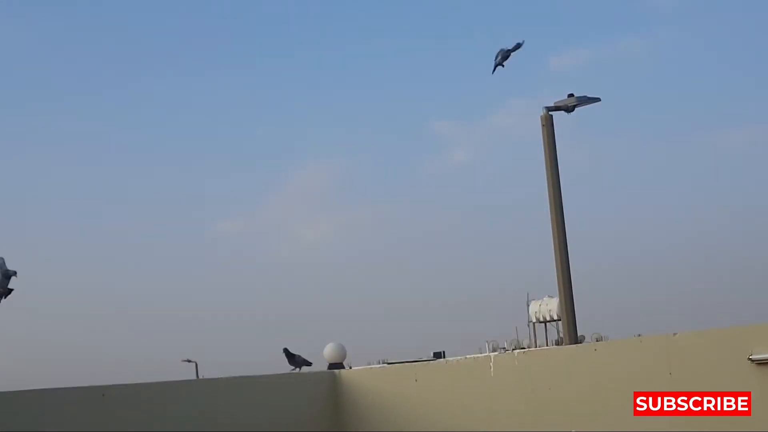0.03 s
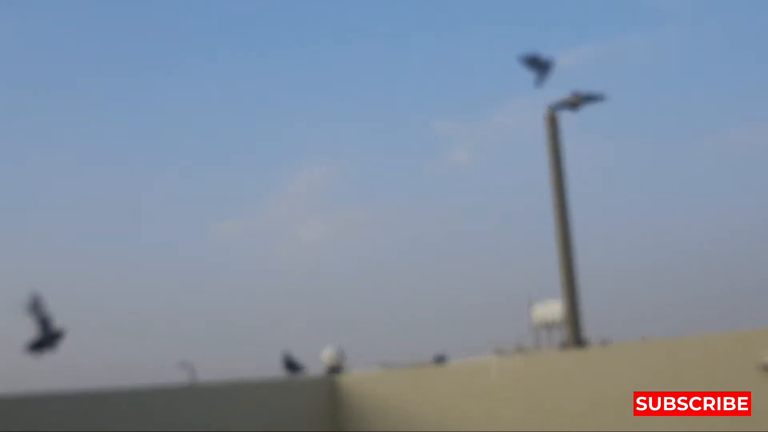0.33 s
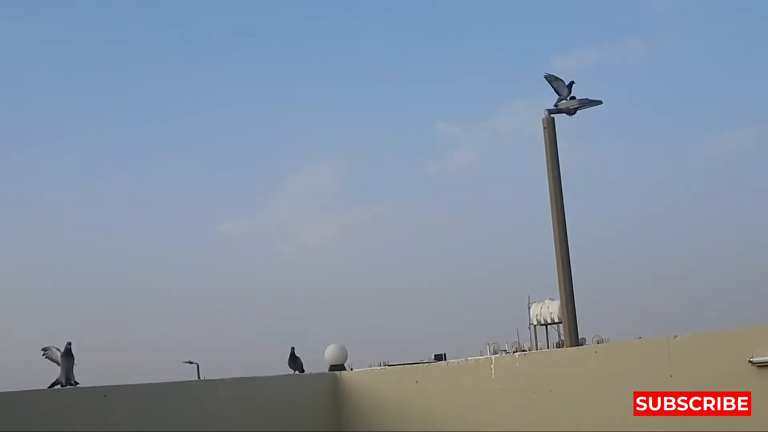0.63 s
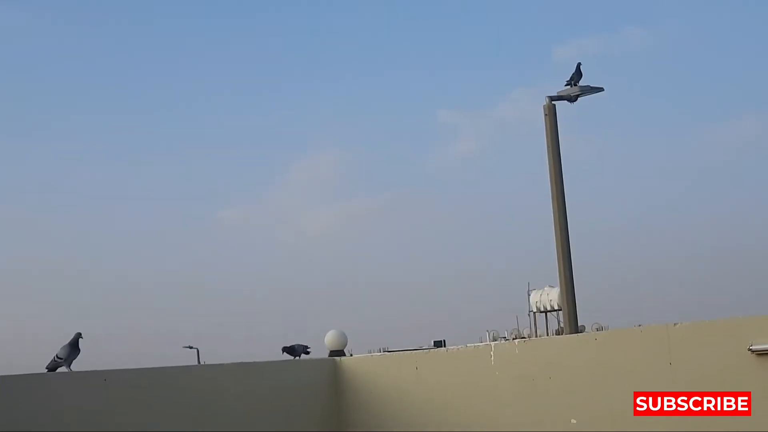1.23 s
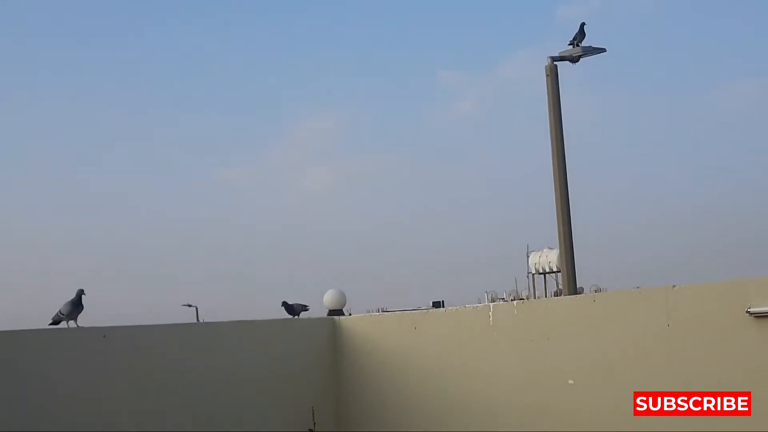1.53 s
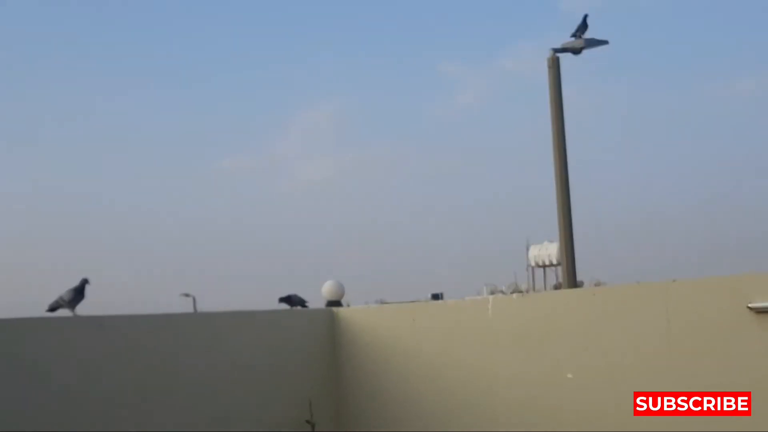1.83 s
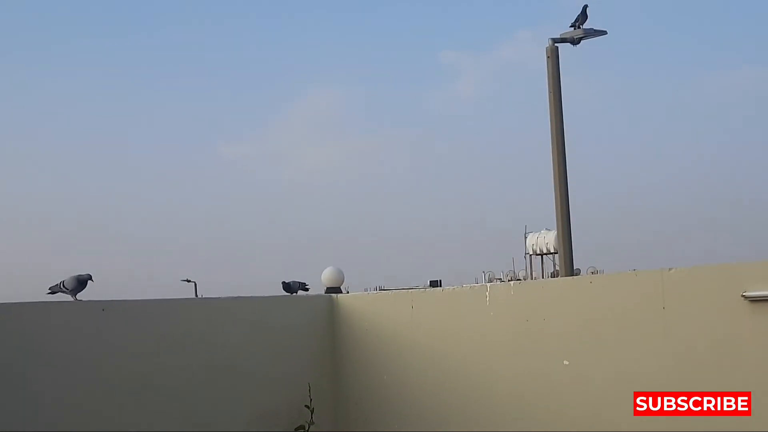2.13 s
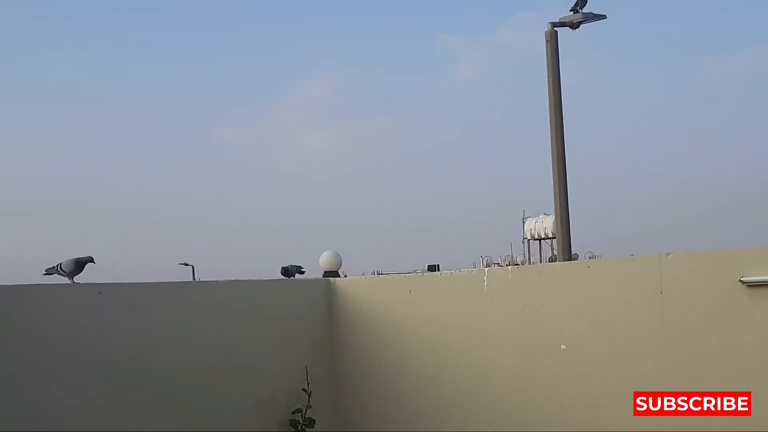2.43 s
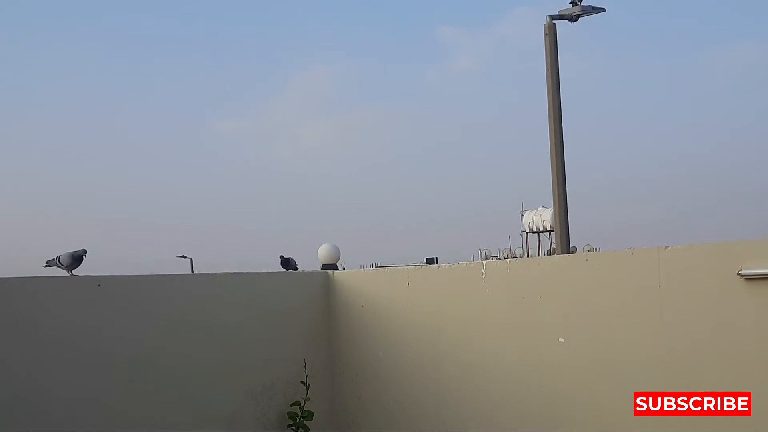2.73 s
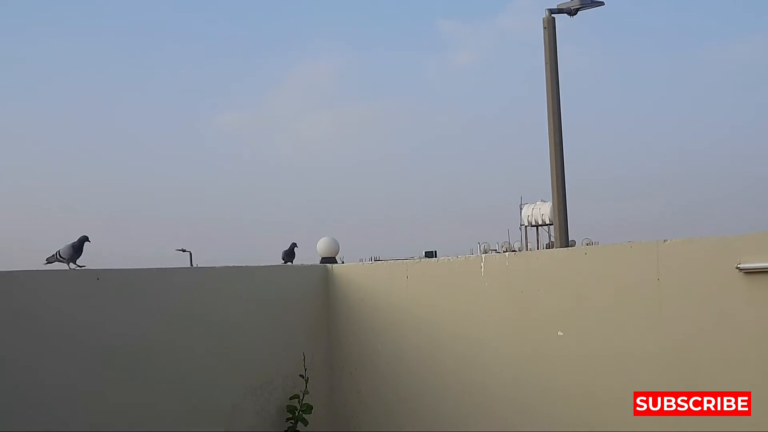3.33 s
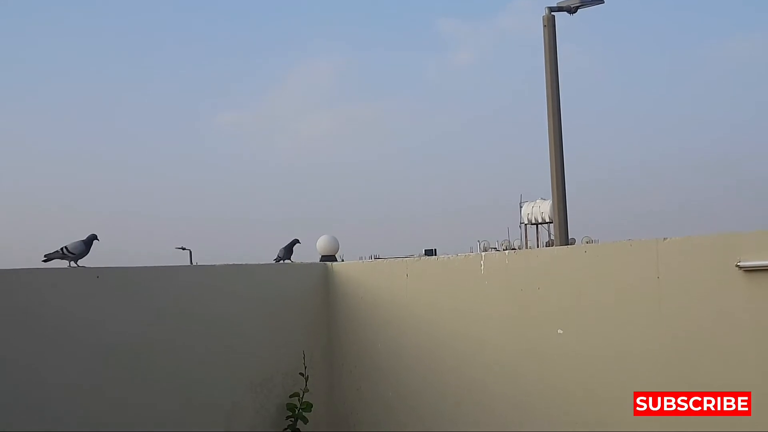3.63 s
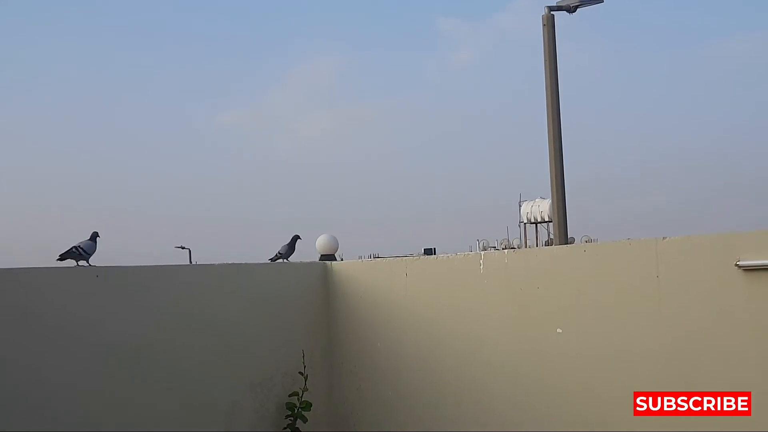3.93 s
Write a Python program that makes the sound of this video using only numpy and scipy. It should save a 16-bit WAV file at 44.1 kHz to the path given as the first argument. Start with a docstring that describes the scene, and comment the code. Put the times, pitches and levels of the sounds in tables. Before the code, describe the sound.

Wings swish and snap in the first second as two pigeons land on an open rooftop. Distant traffic continues, with a low engine slowly rising, another engine swelling in, a few dull road thuds and faintly squeaking brakes.

```python
"""In the first second two pigeons land on a roof terrace, over the wash of distant town traffic:
feathers rub, swish and snap, and the braking downstrokes push puffs of air with a short hum.
Then a vehicle accelerates in the street below the walls, its exhaust tone rising with the firing
rate, and wheels thud over the road. Past the middle a second, rougher engine swells to join it,
a brake squeaks faintly and the wheels thud twice more."""
import sys
import numpy as np
from scipy import signal
from scipy.fft import rfft, irfft
from scipy.io import wavfile

SR = 44100
rng = np.random.default_rng(int(sys.argv[2]) if len(sys.argv) > 2 else 0)


def dump(signal):
    """Clip the signal to [-1, 1] and save it as 16-bit WAV at the path in sys.argv[1]."""
    limited = np.clip(np.atleast_2d(signal).T, -1, 1)
    pcm = np.round(limited * 32767).astype(np.int16)
    wavfile.write(sys.argv[1], SR, pcm)


N = 176400
T, HZ = np.arange(N) / SR, np.fft.rfftfreq(N, 1 / SR)

# spectrum of the street rumble: f/Hz, density level/dB
RUMBLE_SPECTRUM = [(15, -110), (30, -100.5), (42, -81), (60, -79.5), (100, -75.5), (135, -77), (170, -82.5),
                   (240, -84), (330, -88), (450, -92), (700, -112), (2000, -150)]


def feathers():
    """Friction noise: each stroke is a swell of air hiss and clicks of barbs slipping over each other."""
    strokes = [(0.017, -75.5, 0.13, 3.5), (.125, -77, .04, 2), (0.183, -73, 0.062, 2),
               (0.232, -67, 0.013, 4), (0.266, -71, 0.018, -2.5), (0.295, -81, 0.038, 0),
               (0.329, -72, 0.042, 2), (0.35, -71.5, 0.014, -3), (0.397, -72, 0.013, -2),
               (0.424, -73, 0.047, 6), (0.467, -72.5, 0.067, -2), (0.488, -78, 0.017, 0),
               (0.543, -67.5, 0.017, -1), (0.595, -75, 0.051, 0), (0.64, -68.5, 0.022, -2),
               (0.732, -77, .025, 2), (0.85, -79.5, .01, 7)]  # peak t/s, level/dB, length/s, treble tilt/(dB per octave)
    spectrum = [(1500, -18), (2800, 2), (3800, -3), (5000, 1.5), (6500, 2.5), (8000, 0), (9500, -6),
                (10500, -3.5), (13000, -3), (15500, -4.5)]  # feather colour: f/Hz, level/dB
    side = [(3000, -1), (5500, -4.5), (7500, -6.5), (9500, 19), (12000, 0.5), (15500, 3)]  # f/Hz, left minus right/dB
    clicks_per_s, click_share = 6300, 0.24  # share of the power
    out, colour = np.zeros((2, N)), amp(by_hz(spectrum))
    for at, db, length, tilt_db in strokes:
        clicks = rng.standard_normal((2, N)) * (rng.random(N) < clicks_per_s / SR)
        swish = rng.standard_normal((2, N))
        friction = np.sqrt(click_share) * unit(clicks) + np.sqrt(1 - click_share) * swish
        rise, fall = bell(at, 0.31 * length), np.exp(-abs(T - at) / (0.61 * length))
        tilted = unit(colour * amp(tilt_db * np.log2((HZ + 100) / 7000)))
        out += amp(db) * np.where(T < at, rise, fall) * irfft(rfft(friction) * tilted, N)
    direct = amp(-1) * irfft(rfft(out) * pan(by_hz(side)), N)
    return direct + amp(-1.5) * walls(direct)


def walls(x, t60_s=0.64):
    """Reverberation: echoes scattered between the terrace walls build up, then decay exponentially."""
    t = T[:SR]
    tail = rng.standard_normal((2, SR)) * amp(-60 * t / t60_s) * (1 - np.exp(-t / 0.014))
    return signal.fftconvolve(x, tail / np.linalg.norm(tail[0]), axes=1)[:, :N]


def downstrokes():
    """Air displacement: a spread wing shoves a puff while its flight feathers hum on a falling pitch."""
    wingbeats = [(.128, -58, 573, -64.5), (.18, -57.5, 715, -65.5), (.293, -75, 543, -68),
                 (.458, -51.5, 598, -63)]  # peak t/s, puff level/dB, hum f/Hz, hum level/dB
    puff_hz, puff_s, hum_s, sag_per_s = 91, 0.023, 0.016, 1.2
    out = np.zeros(N)
    for at, puff_db, hum_hz, hum_db in wingbeats:
        t = T - at
        out += amp(puff_db) * bell(at, puff_s) * np.sin(2 * np.pi * (puff_hz * t + rng.random()))
        hum_phase = 2 * np.pi * hum_hz * (t - sag_per_s * t ** 2 / 2) + 1.2 * drift(41)
        out += amp(hum_db) * bell(at, hum_s) * np.sin(hum_phase)
    return np.sqrt(2) * out * pan(0.5)


def engines():
    """Diffraction: only the lowest exhaust harmonics of the two engines reach over the wall."""
    firing = [(0, 82.5), (.8, 82.9), (1.2, 86.77), (1.8, 94.93), (2.3, 99.97), (2.7, 103.5), (2.95, 108.1),
              (3.2, 108.7), (3.6, 114), (4, 114.7)]  # accelerating engine: t/s, firing f/Hz
    level = [(0, -87), (.18, -59.5), (.33, -70.5), (.45, -57.5), (.7, -57.5), (1.2, -55), (1.55, -58.5),
             (2.0, -55.5), (2.25, -53.5), (2.38, -44), (2.63, -43), (2.85, -55), (3.0, -49.5), (3.15, -58),
             (3.3, -46), (3.36, -57), (3.42, -53.5), (3.52, -51.5), (3.75, -46.5), (4, -54)]  # its exhaust tone: t/s, level/dB
    orders = [(0.99, 0), (2, -22), (5 / 2, -24)]  # its partials: multiple of the firing rate, relative level/dB
    throb = [(0, -68), (.8, -70.5), (1.1, -59), (1.4, -64.5), (1.6, -70), (2.0, -59), (2.6, -54.5),
             (2.88, -65.5), (3.05, -53), (3.45, -71), (3.85, -53), (4, -62)]  # its beat at half the firing rate: t/s, level/dB
    rough_engine = [(0, 63.27, -68), (1.2, 63.37, -65.5), (1.7, 64.2, -73), (2.25, 66.04, -60),
                    (2.42, 67.5, -65), (2.6, 67.4, -48), (2.88, 69.45, -58), (3.02, 69.96, -58.5),
                    (3.25, 70.5, -52), (3.5, 72.35, -68), (3.75, 73.56, -57.5), (4, 74.7, -63)]  # second engine: t/s, firing f/Hz, level/dB
    octave = [(0, -68.5), (.35, -64), (.5, -58.5), (1.05, -73), (1.23, -56), (1.45, -76.5), (2.0, -57.5),
              (2.3, -71.5), (2.55, -61), (2.85, -66.5), (3, -57.5), (3.25, -54.5), (3.4, -61), (3.54, -49),
              (3.62, -63), (4, -56)]  # its second harmonic: t/s, level/dB
    side = [(0, 3), (1, 1), (1.5, 2), (2.7, 1.1), (2.95, 2.5), (4, 3.5)]  # both engines: t/s, left minus right/dB
    turns = np.cumsum(by_time(firing)) / SR
    exhaust = sum(amp(db) * partial(k * turns, rough=0.1, flutter_hz=4.6) for k, db in orders)
    first = amp(by_time(level)) * exhaust
    first += amp(by_time(throb)) * partial(turns / 2, rough=0.43, flutter_hz=2.7)
    turns = np.cumsum(by_time(rough_engine)) / SR
    second = amp(by_time(rough_engine, column=2)) * partial(turns, rough=0.75, flutter_hz=9)
    second += amp(by_time(octave)) * partial(2 * turns, rough=0.99, flutter_hz=7.9)
    return (first + second) * pan(by_time(side))


def partial(turns, rough, flutter_hz):
    """Multipath interference between the houses makes an exhaust harmonic waver in level and phase."""
    phase = 2 * np.pi * (turns + rng.random())
    in_phase = (1 + rough * drift(flutter_hz)) * np.sin(phase)
    quadrature = rough * drift(flutter_hz) * np.cos(phase)
    return unit(in_phase + quadrature)


def bumps():
    """Impact excitation: a wheel thuds out a burst of rumble and a hollow boom that sinks in pitch."""
    impacts = [(1.197, 0, 270, -52), (2.635, 1, 240, -52), (2.979, 9, 160, -50)]  # t/s, rumble gain/dB, boom starting f/Hz, boom level/dB
    rise_s, fall_s, sag_share, sag_s = 0.0031, 0.024, 0.55, 0.022
    burst, boom = np.zeros(N), np.zeros(N)
    for at, db, hz, boom_db in impacts:
        t = np.maximum(T - at, 0)
        thud = (1 - np.exp(-t / rise_s)) * np.exp(-t / fall_s)
        pitch_hz = hz * (1 - sag_share * (1 - np.exp(-t / sag_s)))
        turns = np.cumsum(pitch_hz) / SR
        burst += amp(db) * thud
        boom += amp(boom_db) * thud * np.sqrt(2) * np.sin(2 * np.pi * (turns + rng.random()))
    return diffuse_field(RUMBLE_SPECTRUM) * burst + boom


def brakes(waver_db=3.5, waver_hz=8):
    """Resonance: brakes ring in narrow bands of noise, heard as faint, wavering squeaks and whines."""
    squeaks = [(2.35, .05, 3515, 70, -87), (2.365, 0.1, 3430, 240, -85.5), (3.086, 0.99, 1590, 67.7, -78),
               (2.66, 0.29, 2405, 75, -77.5), (3.1, 0.4, 3470, 190, -93.5), (1.45, 0.38, 3360, 70, -99),
               (3.72, .25, 2480, 300, -80.5)]  # peak t/s, Gaussian width/s, f/Hz, bandwidth/Hz, level/dB
    out = np.zeros((2, N))
    for at, width_s, hz, bandwidth, db in squeaks:
        band = 1 / (1 + ((HZ - hz) / (bandwidth / 2)) ** 4)
        ring = irfft(rfft(rng.standard_normal((2, N))) * band, N)
        out += amp(db + waver_db * drift(waver_hz)) * bell(at, width_s) * unit(ring)
    return out * pan(-2.5)


def traffic():
    """Incoherent addition: rumble, tyre wash and high tyre hiss sum, swelling as vehicles come closer."""
    wash_spectrum = [(100, -110), (400, -100.5), (620, -100), (800, -96), (980, -95), (1200, -97),
                     (1450, -98.5), (1900, -100.5), (2400, -109), (2700, -118), (3000, -126), (3400, -124),
                     (4000, -136), (6000, -145)]  # distant tyres: f/Hz, density level/dB
    fizz_spectrum = [(2500, -140), (3400, -133), (4200, -133), (4800, -132), (6500, -136), (9000, -136),
                     (12000, -135), (15500, -136)]  # high tyre hiss: f/Hz, density level/dB
    # swell of each layer: t/s, gain/dB
    rumble_gain = [(0, -4), (.8, -2), (1.05, -3.5), (1.2, -1), (1.4, -1), (2.1, -2), (2.62, 2), (2.85, 1),
                   (3.0, 1), (3.6, -1), (4, 1)]
    wash_gain = [(0, 4), (.5, 4), (1.2, 2.5), (2.1, 2.5), (2.5, 5), (3.2, 4.5), (4, 6)]
    fizz_gain = [(0, -6), (.85, 4), (1.2, 6), (1.5, 3), (2.1, 4), (2.5, 7.5), (3.1, 5.5), (3.5, 4),
                 (4, 7.5)]
    rumble = diffuse_field(RUMBLE_SPECTRUM) * amp(by_time(rumble_gain) + 0.23 * drift(18))
    wash = diffuse_field(wash_spectrum) * amp(by_time(wash_gain) + 0.59 * drift(17))
    fizz = diffuse_field(fizz_spectrum) * amp(by_time(fizz_gain))
    return rumble + wash + fizz


def hiss():
    """Self-noise: the microphones add a faint, steady hiss."""
    spectrum = [(2000, -133), (5000, -132), (7500, -132.5), (9500, -131.5), (11000, -130), (15500, -130)]  # noise floor: f/Hz, density level/dB
    return diffuse_field(spectrum)


def diffuse_field(spectrum):
    """Spatial coherence: diffuse noise at two points is most alike in the bass, where waves are long."""
    likeness = [(60, 0.99), (120, 0.87), (180, 0.85), (340, 0.69), (490, 0.41), (620, 0.19), (940, 0.06),
                (1180, 0.61), (1400, 0.55), (1750, 0.43), (2200, 0.035), (2500, .33), (4000, 0)]  # f/Hz, coherence of left and right
    lead = [(600, 0), (850, -0.1), (1000, 3), (1400, 3), (1720, 2), (1980, 1.5), (2240, -.7), (2500, -2),
            (3500, -1.5)]  # f/Hz, phase lead of the left/rad
    side = [(60, -2), (170, 1.5), (400, -1.5), (900, -1), (1400, -1), (2100, -8), (2800, -1), (5000, -1),
            (12000, -0.5)]  # f/Hz, left minus right/dB
    common, separate = rfft(rng.standard_normal((2, N)))
    coherence = by_hz(likeness)
    left = common * np.exp(1j * by_hz(lead))
    right = coherence * common + np.sqrt(1 - coherence ** 2) * separate
    coloured = np.array([left, right]) * amp(by_hz(spectrum)) * pan(by_hz(side))
    return irfft(coloured, N) * np.sqrt(SR / 2)


def amp(db):
    """Amplitude ratio of a level."""
    return 10 ** (np.asarray(db) / 20)


def unit(x):
    """Normalisation to an RMS of 1."""
    return x / np.sqrt(np.mean(x ** 2) + 1e-30)


def by_hz(points):
    """Interpolation of a spectrum on a log-frequency axis."""
    f, value = np.transpose(points)
    return np.interp(np.log(HZ + 1), np.log(f), value)


def by_time(points, column=1):
    """Linear interpolation of a control curve in time."""
    rows = np.array(points)
    return np.interp(T, rows[:, 0], rows[:, column])


def pan(db):
    """Constant-power gains for a level difference, left minus right."""
    gains = np.array([amp(db / 2), amp(-db / 2)]).reshape(2, -1)
    return gains / np.sqrt((gains ** 2).mean(0))


def drift(rate_hz):
    """Low-pass noise: slow random motion with an RMS of 1."""
    return unit(irfft(rfft(rng.standard_normal(N)) / (1 + (HZ / rate_hz) ** 4), N))


def bell(at, width_s):
    """Gaussian envelope."""
    return np.exp(-.5 * ((T - at) / width_s) ** 2)


def scene():
    """Superposition: the pressures from the pigeons and the street add."""
    return feathers() + downstrokes() + engines() + traffic() + bumps() + brakes() + hiss()


def record(dry, edge_hz=15500, fade_s=0.002):
    """Band limiting: the ends fade briefly and a low-pass filter removes the highest treble."""
    ends = np.sin(np.pi / 2 * np.minimum(np.minimum(T, T[::-1]) / fade_s, 1)) ** 2
    low_pass = signal.firwin(511, edge_hz, window=("kaiser", 9), fs=SR)
    return signal.oaconvolve(dry * ends, low_pass[None], "same")


dry = scene()
out = record(dry)
dump(out)
```